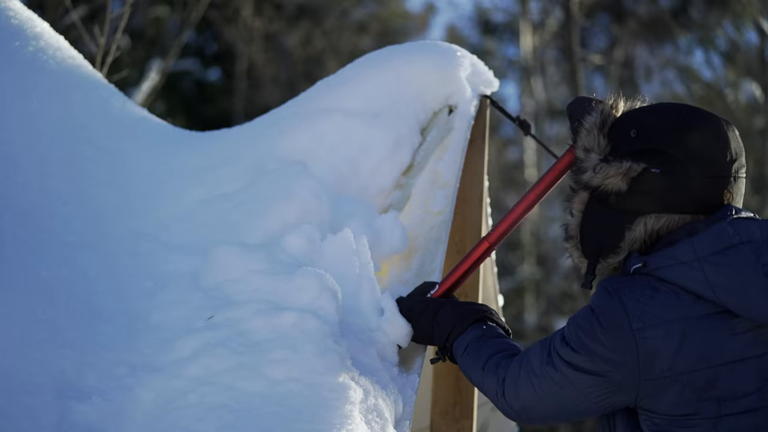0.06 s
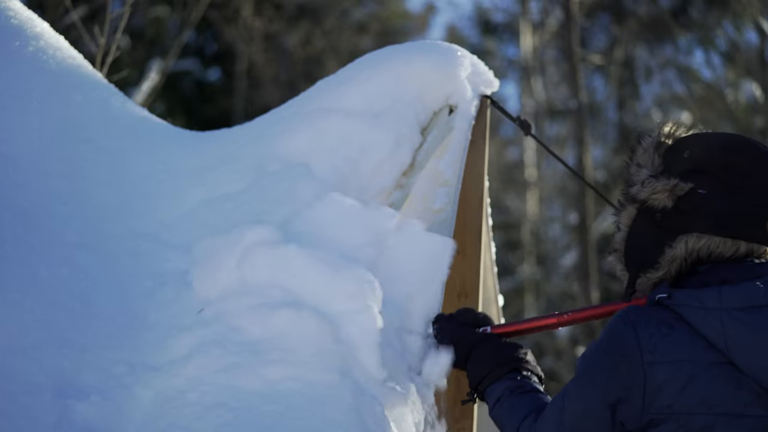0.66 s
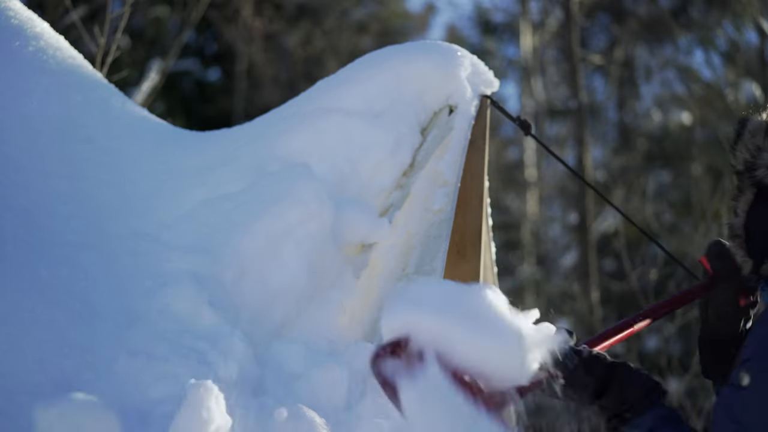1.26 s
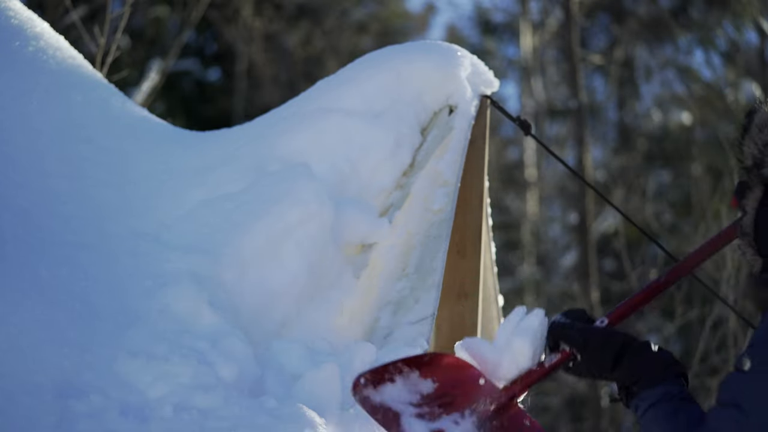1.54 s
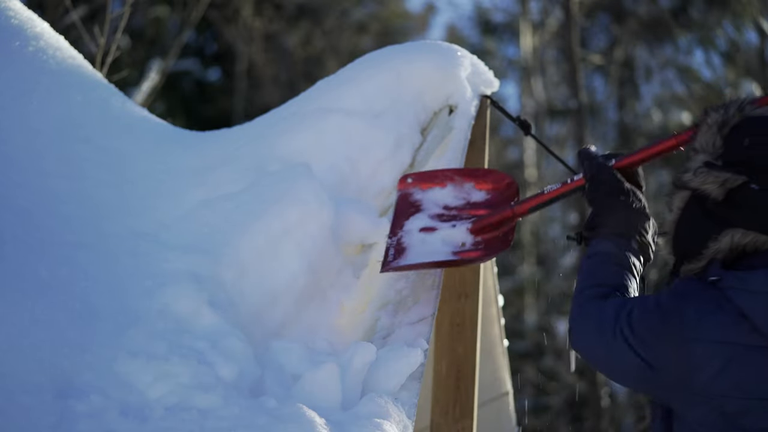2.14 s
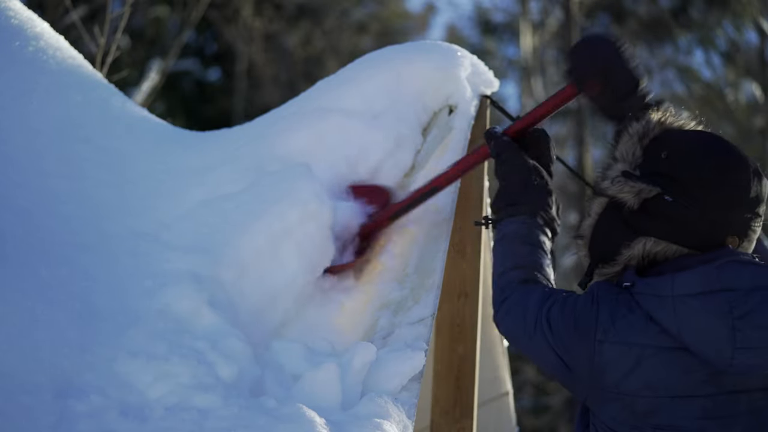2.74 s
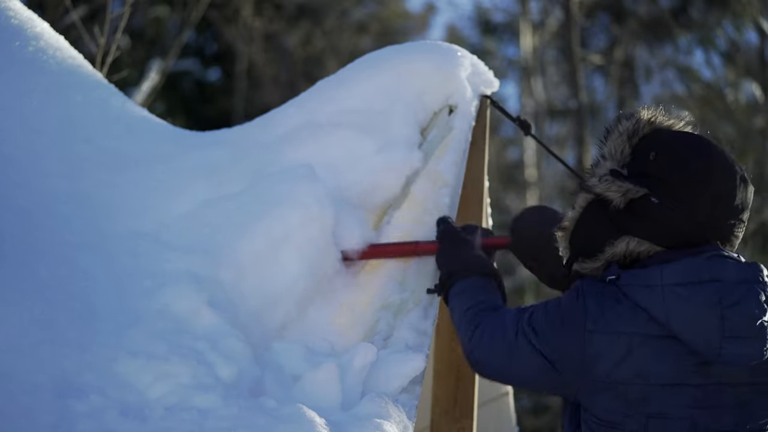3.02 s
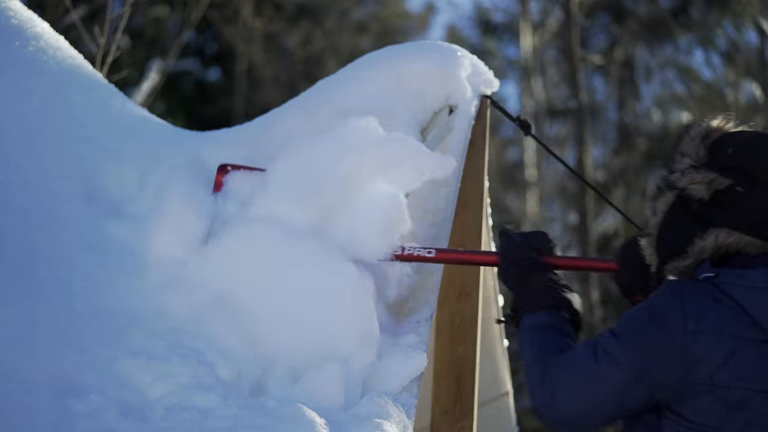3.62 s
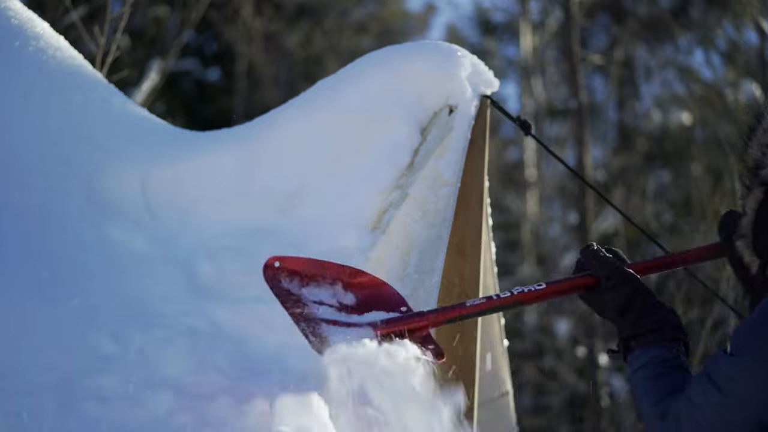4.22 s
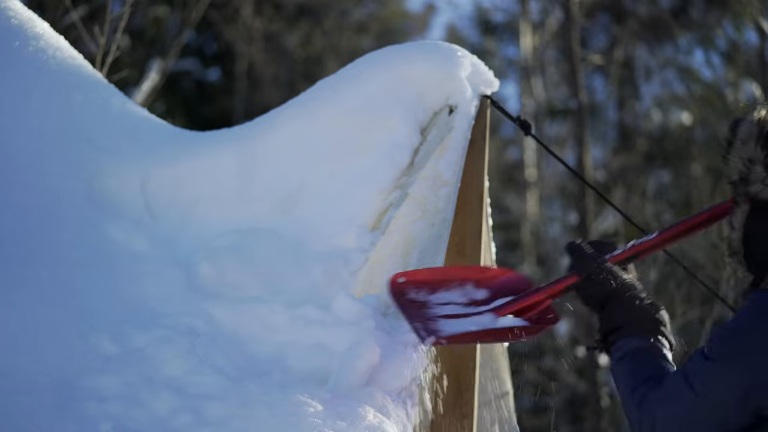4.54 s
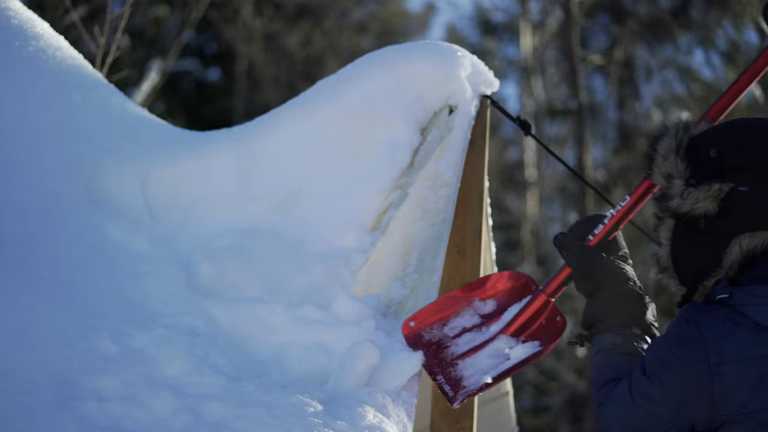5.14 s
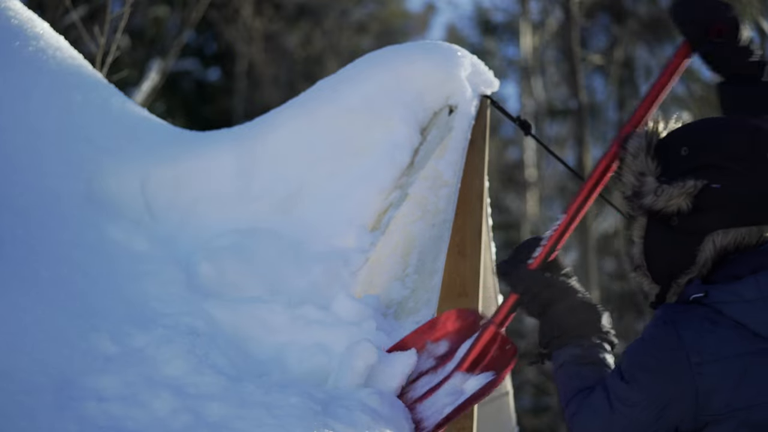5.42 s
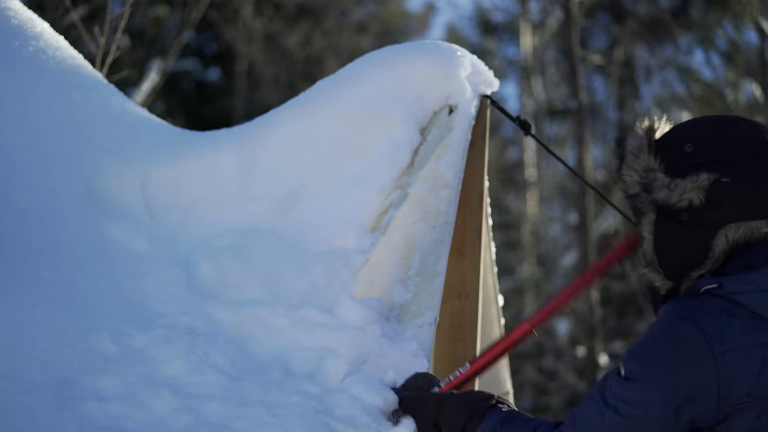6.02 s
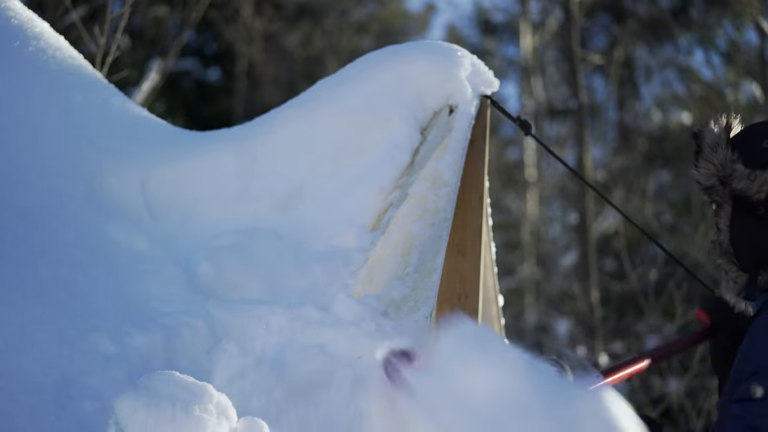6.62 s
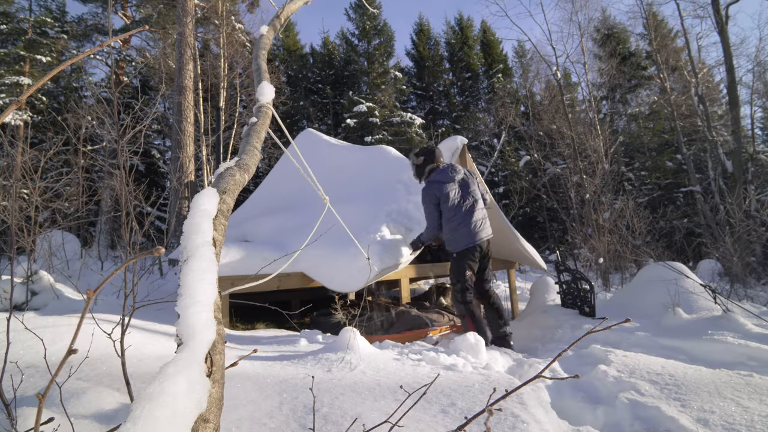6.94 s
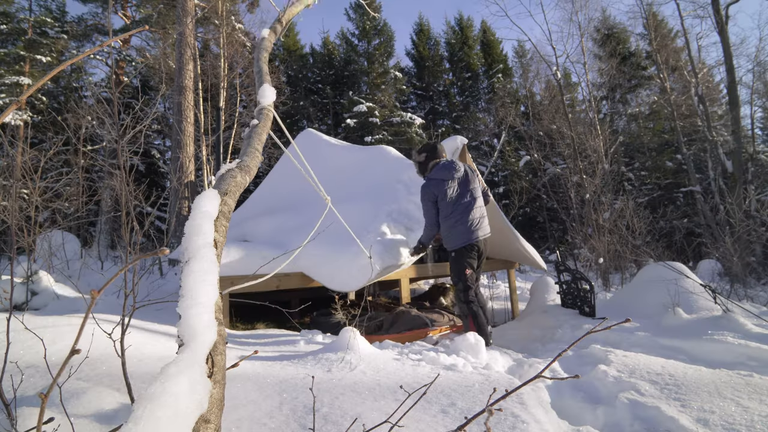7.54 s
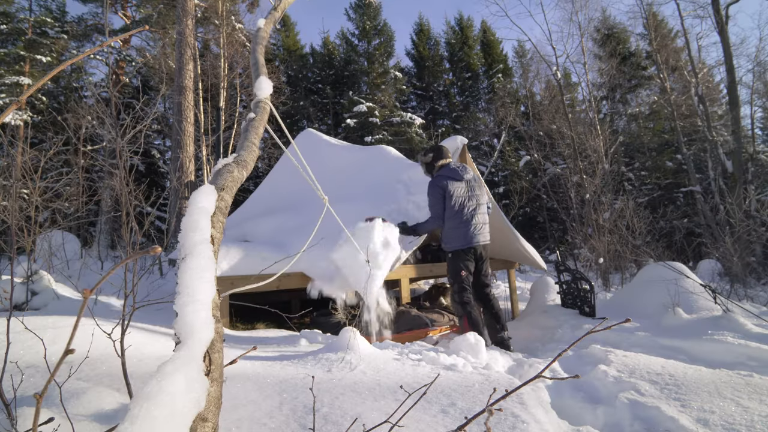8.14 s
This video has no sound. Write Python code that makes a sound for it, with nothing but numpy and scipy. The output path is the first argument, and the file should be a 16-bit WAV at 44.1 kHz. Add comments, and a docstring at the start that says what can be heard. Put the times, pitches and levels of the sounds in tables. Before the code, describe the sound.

A shovel scrapes heavy snow off a canvas tent roof in four crunching loads, with soft thuds and a final sharp knock.

```python
"""Shovelling snow off a tent

A shovel drags heavy snow off a canvas roof in four loads, close by in a still winter wood. Crust breaks
in dense grains, clods give way, packed snow crumps on the canvas and powder hisses as it slides off.
The scoop colours the scraping, the metal shaft clicks and rings, lumps thud down, and a sharp knock
of the blade ends it."""
import sys
import numpy as np
from scipy import signal
from scipy.fft import rfft, irfft, next_fast_len
from scipy.io import wavfile
from scipy.ndimage import uniform_filter1d

SR = 44100
rng = np.random.default_rng(int(sys.argv[2]) if len(sys.argv) > 2 else 0)


def persist_wave(psi):
    """Save psi, clipped to +-1, as 16-bit WAV."""
    counts = np.round(np.clip(psi, -1, 1) * 32767).astype(np.int16)
    wavfile.write(sys.argv[1], SR, np.atleast_2d(counts).T)


N = 369558
TIME = np.arange(N) / SR

# slabs breaking away: t/s, rise/s, hold/s, release/s, swish/dB, crunch of their edges/dB
SLAB_FALLS = [(.25, 0.17, 0.17, .4, -73, -63.5), (2.1, 0.058, 0.017, 0.61, -61.5, -59.5),
              (3.63, 0.028, 0.035, 0.07, -62, -61), (3.82, 0.042, 0.094, 0.14, -74, -60),
              (4.14, 0.034, 0.014, 0.054, -68, -77), (5.5, 0.21, 0.033, .5, -79, -65),
              (6.65, 0.1, 0.059, 0.68, -63, -63), (7.33, 0.086, 0.35, 0.88, -57.5, -68),
              (8.31, 0.019, 0.044, 0.24, -58.5, -61.5)]
# modes of the metal shaft: f/Hz, level/dB, t60/s
SHAFT_MODES = [(3424, -6, 0.03), (5450, 3, 0.034), (5580, -3, 0.012)]
# modes of the free scoop: f/Hz, level/dB, t60/s
SCOOP_MODES = [(546, -14.5, 0.13), (818, -14.5, 0.14), (706, -16, 0.09), (987, -18, 0.082),
               (1120, -16, .06), (1606, -12, 0.1), (1710, -5, 0.055), (1797, -1.5, 0.077), (1958, 1, 0.035),
               (2310, -13, .05), (2440, -7.5, 0.079), (2768, 0, .06), (2870, -5.5, 0.099),
               (2954, -13, 0.054), (3130, -19, 0.11), (3480, -10, 0.09), (3694, -9, 0.055),
               (4200, -12, .06), (4460, -8, 0.055), (4700, -12, 0.087), (5160, -3, 0.051), (5200, 1, 0.036),
               (5340, -3, .035), (6380, -11, .05), (6560, -2, .035), (7327, -7, .035), (7820, -14, .04)]


def undb(db):
    """Decibels to gain."""
    return 10 ** (np.asarray(db) / 20)


def unit(x):
    """Scale to rms 1."""
    return x / np.sqrt(np.mean(x ** 2))


def colour(x, curve, tilt_db=0):
    """EQ by a curve of (f/Hz, level/dB); the tilt per octave pivots at 3 kHz, flat below 375 Hz."""
    size = next_fast_len(len(x) + 512)
    octave = np.log2(np.maximum(np.fft.rfftfreq(size, 1 / SR), 1))
    hz, db = np.transpose(curve)
    from_pivot = np.maximum(octave - np.log2(3000), -3)
    gain = undb(np.interp(octave, np.log2(hz), db) + tilt_db * from_pivot)
    return irfft(rfft(x, size) * gain, size)[:len(x)]


def ring(x, modes):
    """Drive a set of decaying modes."""
    t = TIME[:SR // 6]
    response = 0
    for hz, db, t60 in modes:
        phase = 2 * np.pi * hz * t + rng.uniform(0, 2 * np.pi)
        response += undb(db) * np.exp(-np.log(1000) * t / t60) * np.sin(phase)
    return signal.fftconvolve(x, response / np.sqrt(np.sum(response ** 2)))[:len(x)]


def resonate(x, peaks):
    """Drive a set of broad resonances, each applied twice for dark valleys."""
    out = 0
    for hz, width, db in peaks:
        b, a = signal.iirpeak(hz, hz / (1.5 * width), fs=SR)
        out += undb(db) * signal.lfilter(b, a, signal.lfilter(b, a, x))
    return out


def walk(rate):
    """Random modulation at rms 1, gliding to a new value rate times a second."""
    step = max(int(SR / rate), 2)
    held = np.repeat(rng.standard_normal(N // step + 1), step)
    return unit(uniform_filter1d(held, step)[:N])


def grains(rate, spread_db):
    """Tiny fractures of uneven size at random moments, about rate a second; rms 1."""
    chance = np.clip(rate / SR, 1e-4, 1)
    size = undb(spread_db * np.minimum(rng.exponential(size=N), 5))
    return unit((rng.random(N) < chance) * size * rng.choice([-1, 1], N) / np.sqrt(chance))


def burst(decay_s, rise_s):
    """Noise that builds up and dies away, like a run of micro-fractures."""
    t = TIME[:SR // 6]
    envelope = np.minimum(t / rise_s, 1) * np.exp(-np.maximum(t - rise_s, 0) / decay_s)
    return rng.standard_normal(len(t)) * envelope


def gestures(table):
    """Power envelopes that swell, hold and fall 20 dB per release time, then the remaining columns."""
    power = np.zeros((len(table), N))
    for row, (start, rise_s, hold_s, release_s, *_) in enumerate(table):
        span = slice(*np.searchsorted(TIME, [start, start + rise_s + hold_s + 3 * release_s]))
        t = TIME[span] - start
        fall = np.exp(-2 * np.log(10) * np.maximum(t - rise_s - hold_s, 0) / release_s)
        power[row, span] = np.minimum(t / rise_s, 1) ** 2 * fall
    return power, *np.transpose(table)[4:]


def together(power, db):
    """Joint amplitude of overlapping gestures, each at its own level."""
    return np.sqrt(undb(db) ** 2 @ power + 1e-18)


def add(out, start, x, peak_db):
    """Mix in a one-shot at start seconds."""
    i = int(start * SR)
    out[i:i + len(x)] += (x * undb(peak_db) / np.max(np.abs(x)))[:N - i]


def sliding_snow(slip_db=0.76, catch_db=1.52, lurch_db=0.15, grain_rate=4200, ice_rate=1100):
    """Snow sticks and slips under the blade; faster sliding breaks more grains and sounds smoother."""
    # blade strokes through the crust: t/s, rise/s, hold/s, release/s, crunch/dB, grit/dB, powder/dB,
    # scoop/dB (these three against the crunch), hardness/(dB per octave), clear ring against rasp/dB
    strokes = [(0, 0.00047, 0.01, 0.17, -59, -1, -0.5, -14, -2, -5),
               (.25, .034, 0.47, .2, -78, 7, -14, -18, -1, -6),
               (.87, 0.016, 0.18, 0.043, -58, 0.5, 4, -3, 8, -3),
               (1.08, 0.031, 0.1, 0.12, -61, 3.5, 5, 9, 7, -3),
               (1.28, 0.029, 0.035, 0.03, -47, -7.5, -3.5, 7, 12, 9),
               (1.352, 0.012, 0.017, 0.034, -41.5, -8, -6, 9, 5, 17),
               (1.435, 0.0094, 0.041, 0.12, -54.5, -5, -3.5, 12, -8, 3),
               (1.63, .11, 0.1, 0.041, -59, -1.5, -4, -6, 8, 3),
               (2.46, 0.031, 0.0094, 0.25, -55.5, -3.5, -3, -9, -2, -5),
               (2.65, 0.078, 0.11, 0.26, -53, 4.5, 3.5, -4, 0, 3),
               (2.797, 0.021, 0.013, 0.045, -47, 2, -8, 3, 9, 2),
               (4.08, .1, 0.022, 0.061, -58.5, -3.5, -2, -4, -8, 1),
               (4.35, 0.038, 0.035, 0.03, -60.5, -0.5, 2, -3.5, 2, 0),
               (4.41, .025, 0.097, 0.074, -73.5, 4, 13, -7, 0, -6),
               (4.483, .006, 0.021, 0.11, -62.5, -3, -8, -14, -4, -6),
               (4.57, .025, 0.035, .04, -75.5, 6, 4, 6, 4, -2),
               (5.08, 0.069, 0.0064, 0.097, -70.5, -3, -13, -10, -6, -6),
               (5.26, 0.0036, 0.019, .02, -61.5, -6, -16, 6, -3, -5),
               (5.297, .008, 0.2, .05, -68, 3, -4, -5, -2, -3), (5.35, .02, .13, .05, -69, 6, -5, -3, 1, 0),
               (5.49, 0.063, 0.12, 0.25, -44.5, 0, -7.5, 4, -9, -3),
               (5.58, 0.11, 0.13, 0.58, -44, -2.5, -1, 3, 8, -3),
               (5.7, 0.19, 0.062, 0.19, -56, -3, 11, -3, 2, 3),
               (6.63, 0.068, 0.17, 0.12, -52, -0.5, -4, 2, 7, -2),
               (6.975, 0.021, 0.037, 0.055, -53.5, 0.5, -4, -20, 1, -1),
               (7.4, .03, .033, 0.2, -54.5, -8, -18, -22, 4, -6),
               (7.78, 0.12, 0.069, 0.17, -51, -1.5, -3, -7, -12, -6),
               (8.1, .02, 0.011, 0.069, -60.5, 5, 2, 5, 5, 2),
               (8.16, 0.044, 0.033, .05, -51.5, 1.5, -5, -1, -7, 3)]
    # the loose load creeping off: t/s, rise/s, hold/s, release/s, crump/dB, crumbs/dB, powder/dB
    slides = [(0, 0.0009, 0.023, 0.61, -65.5, -65, -78), (.22, 0.073, 0.65, 0.8, -62.5, -58, -62),
              (1.29, 0.041, 0.059, 0.049, -62, -62, -59), (1.48, 0.2, 0.044, 0.23, -85, -69, -58.5),
              (1.7, 0.059, 0.49, 0.48, -74.5, -70.5, -71), (2.1, 0.16, 1.57, 0.87, -67.5, -64.5, -64.5),
              (2.68, 0.12, 0.035, 0.3, -56.5, -74, -70), (4.35, 0.032, 0.032, 0.049, -66.5, -68, -75),
              (4.2, 0.062, 0.52, 0.2, -76, -74, -80), (5.5, 0.26, 0.44, 0.5, -60.5, -55.5, -73),
              (6.54, 0.084, 0.052, .1, -67, -64, -65.5), (6.68, 0.15, 0.25, 0.22, -63, -63, -71),
              (7.05, 0.23, 0.11, 0.18, -71.5, -61.5, -66), (7.35, 0.1, 0.63, 0.8, -60.5, -57.5, -81),
              (7.8, 0.19, 0.025, 0.092, -54.5, -68, -74)]
    # EQ of breaking crust, icy grit, fine powder and packed snow: f/Hz, level/dB
    crunch_eq = [(250, -31), (600, -7), (850, -4), (1300, 0.5), (2000, 0.5), (3000, -2), (4200, -7.5),
                 (6000, -18), (9000, -38), (16000, -45)]
    grit_eq = [(1800, -22), (3200, 0.5), (4300, 1.5), (5300, 3), (6500, 0), (8000, -3.5), (10000, -9.5),
               (16000, -17)]
    powder_eq = [(4000, -41), (7000, -1), (9000, 0), (11000, 0), (14000, 0.5), (16000, 2)]
    crump_eq = [(40, -46), (70, -22), (105, -3.5), (170, -2), (260, 0), (340, 1), (430, 2), (530, -2.5),
                (700, -7.5), (1400, -22)]
    crumb_grit_db, press_db, press_limit_db = -3.5, -16.5, -67

    stroke, stroke_db, grit_db, powder_db, scoop_db, hardness_db, clear_db = gestures(strokes)
    slide, crump_db, crumbs_db, dust_db = gestures(slides)
    slab, _, edge_db = gestures(SLAB_FALLS)
    blade, crumbs = together(stroke, stroke_db), together(slide, crumbs_db)
    loose = np.hypot(crumbs, together(slab, edge_db))
    flow = (np.hypot(blade, loose) / undb(-57.5)) ** .6
    roughness = np.clip(flow ** -.25, .4, 1.1)
    judder_db = (slip_db * walk(420) + catch_db * walk(70)) * roughness
    slips = unit(undb(judder_db + lurch_db * walk(35)))

    crust = unit(colour(grains(grain_rate * flow, spread_db=2.0), crunch_eq))
    scrape = grains(grain_rate * flow, spread_db=2.5) * slips
    hardness = (hardness_db * undb(stroke_db) ** 2) @ stroke / blade ** 2
    rasp, clear = scoop_rasp(scrape, hardness), scoop_ring(scrape)
    # crust, hollow rasp and clear ring share each stroke's power
    crust_db = stroke_db - 10 * np.log10(1 + undb(scoop_db) ** 2)
    rasp_db = crust_db + scoop_db - 10 * np.log10(1 + undb(clear_db) ** 2)
    ice = grains(6000 * flow, spread_db=2.5) * slips * undb(0.73 * walk(150))
    grit = blade_shimmer(colour(ice, grit_eq))
    # powder is a smooth hiss with larger ice crystals ticking in it
    crystals = grains(ice_rate * flow, spread_db=1.5) * np.clip(1.1 / flow ** .5, .1, 1)
    powder = blade_shimmer(colour((rng.standard_normal(N) + crystals) * slips, powder_eq))
    # packed snow collapses in coarser steps, muffled by the canvas
    crump = unit(colour(grains(1600, spread_db=1.3) * slips, crump_eq))
    pressed = np.minimum(blade * undb(press_db), undb(press_limit_db))
    return (crust * slips * np.hypot(together(stroke, crust_db), loose)
            + rasp * together(stroke, rasp_db)
            + clear * together(stroke, rasp_db + clear_db)
            + grit * np.hypot(together(stroke, stroke_db + grit_db), crumbs * undb(crumb_grit_db))
            + powder * np.hypot(together(stroke, stroke_db + powder_db), together(slide, dust_db))
            + crump * np.hypot(together(slide, crump_db), pressed))


def scoop_rasp(scrape, tilt_db, wander_db=2):
    """The buried scoop rasps; resonances swell as the contact travels, and hard contact is brighter."""
    # resonances damped by snow: f/Hz, width/Hz, level/dB
    buried_peaks = [(957, 41, -11), (1650, 180, 1), (1800, 220, 1), (2314, 250, 1), (2706, 380, 1.5),
                    (3140, 570, -4.5), (4200, 650, -14), (5100, 470, -18), (6130, 500, -29)]
    out, power = 0, 0
    for hz, width, db in buried_peaks:
        gain = undb(db + tilt_db * np.log2(hz / 2500))
        out += resonate(scrape, [(hz, width, 0)]) * gain * undb(wander_db * walk(22))
        power += gain ** 2 * width
    return unit(out / np.sqrt(power))


def scoop_ring(scrape, wander_db=3, wander_rate=7):
    """The bare part of the scoop rings clearly; which modes answer changes as the contact travels."""
    # modes with the edge pressed down: f/Hz, level/dB, t60/s
    pressed_modes = [(1285, -14, .035), (1750, -5.5, 0.056), (2237, 0.5, .02), (2573, 1, 0.037),
                     (2770, -1.5, 0.022), (3280, -13, .03), (3490, -5.5, 0.046), (3690, -5, 0.032),
                     (3880, -2.5, 0.034), (4650, -2, 0.038), (4950, -8.5, 0.034), (5400, -3.5, 0.038),
                     (6350, -9, .025), (7540, -10, 0.033), (8900, -7.5, 0.024), (11000, -13, 0.018)]
    out = 0
    for hz, db, t60 in pressed_modes:
        width = np.log(1000) / (np.pi * t60)
        mode = signal.lfilter(*signal.iirpeak(hz, hz / width, fs=SR), scrape)
        out += mode * undb(db + wander_db * walk(wander_rate)) / width
    return unit(out)


def blade_shimmer(x, tail_db=-8, decay_s=0.0058):
    """The blade's crowded high modes give each grain a short tail that shifts as the contact moves."""
    out = x
    for _ in range(3):
        tail = burst(decay_s, rise_s=0.00047)[:SR // 30]
        ringing = signal.oaconvolve(x, tail / np.sqrt(3 * np.sum(tail ** 2)))[:N]
        out = out + undb(tail_db) * ringing * np.clip(walk(2.49), -1, 1)
    return unit(out)


def shaft_rub(waver_db=3, drift_hz=32):
    """Ice grains scratch the metal tube and keep it ringing in short squeaks."""
    # rubs on the roof edge: t/s, rise/s, hold/s, release/s, ring/dB, whistle/dB
    rubs = [(0, 0.0056, 0.027, 0.14, -62.5, -80), (.26, 0.066, 0.4, 0.45, -61, -77),
            (.47, 0.025, 0.015, 0.16, -56, -71), (1.2565, .001, .002, 0.04, -57, -45),
            (1.28, .03, 0.08, .2, -64, -75), (2.7, .13, .06, .1, -58, -72),
            (4.35, 0.036, 0.03, .08, -67, -62), (5.6, 0.23, .22, .65, -57, -63),
            (6.64, 0.004, .003, 0.027, -62, -49), (6.66, 0.036, 0.18, 0.051, -73, -63),
            (6.99, 0.015, 0.024, .06, -55, -62), (7.4, .03, .015, .06, -51.5, -68),
            (7.62, .08, .05, .25, -77, -80)]
    # the thin top whistle: f/Hz, width/Hz, level/dB
    whistle_peaks = [(15150, 140, 0), (15500, 260, -7)]
    rub, ring_db, whistle_db = gestures(rubs)
    scratches = grains(1800, spread_db=2.2) * undb(waver_db * walk(40))
    # the moving contact keeps detuning the ring
    drift = np.exp(2j * np.pi * drift_hz * np.cumsum(walk(120)) / SR)
    analytic = signal.hilbert(ring(scratches, SHAFT_MODES), next_fast_len(N))[:N]
    singing = unit(np.real(analytic * drift))
    whistle = unit(resonate(scratches, whistle_peaks))
    return singing * together(rub, ring_db) + whistle * together(rub, whistle_db)


def winter_air(level_db=-77):
    """A faint bed of outdoor noise whose level drifts slowly."""
    # EQ of the still wood: f/Hz, level/dB
    air_eq = [(20, -23), (38, -23), (48, -3), (60, -14), (100, -7.5), (280, -16), (420, -3), (620, -17.5),
              (2000, -14), (8000, -20.5), (16000, -23.5)]
    return unit(colour(rng.standard_normal(N), air_eq)) * undb(level_db + walk(1.54))


def slab_swish():
    """Slabs of soft snow swish down the canvas in small jerks."""
    # EQ of soft snow on cloth: f/Hz, level/dB
    swish_eq = [(200, -15), (450, -3.5), (650, 0), (900, -1.5), (1300, -5.5), (2000, -9), (4000, -19)]
    slab, swish_db, _ = gestures(SLAB_FALLS)
    friction = grains(3000, spread_db=2.5) * undb(2 * walk(60))
    return unit(colour(friction, swish_eq)) * together(slab, swish_db)


def shaft_clicks(boost_db=4.0, decay_s=0.0024):
    """Sharp ticks of the shovel set its shaft ringing."""
    # clicks: t/s, peak before the boost/dB, ring against tick/dB, f/Hz
    clicks = [(.2715, -46, -12, 5800), (.357, -44.5, -15, 5600), (0.479, -50, -10, 6500),
              (0.497, -44, -7, 5500), (0.581, -44.5, -1, 5500), (.788, -44.5, -15, 5600),
              (0.8406, -34.5, -15, 5700), (.9921, -40, -13, 5800), (1.257, -47, -12, 5800),
              (1.449, -42, -15, 7500), (1.547, -44, -26, 9700), (1.59, -51, -20, 10500),
              (2.009, -57, -24, 10000), (2.7112, -33.5, -20, 5000), (3.786, -34.5, -24, 5970),
              (4.314, -50.5, -15, 5500), (4.7105, -47.5, -22, 9000), (6.366, -35, -25, 5800),
              (6.6436, -42.5, -23, 5730), (7.6945, -44.5, -6, 5500)]
    out = np.zeros(N)
    for start, db, ring_db, hz in clicks:
        tick_eq = [(500, -17), (2000, -6), (hz * 0.81, -2.5), (hz, 7.5), (hz * 1.33, 1.5), (16000, -3.5)]
        tick = colour(burst(decay_s, rise_s=0.00031), tick_eq)
        add(out, start, tick + undb(ring_db) * ring(tick, SHAFT_MODES), db + boost_db)
    return out


def crust_snaps(boost_db=4, ring_db=-19.0):
    """The crust snaps and the scoop rings faintly with it."""
    # snaps: t/s, peak before the boost/dB, tilt/(dB per octave), decay/s
    snaps = [(.335, -55, -7, .003), (1.377, -35, 3.5, 0.0036), (1.7963, -34.5, 1.5, 0.0012),
             (3.051, -55, -5, 0.0046), (3.103, -43, 0, 0.0019), (3.122, -44.5, -1, 0.0056),
             (3.321, -52, 1, 0.007), (3.381, -54, 1, .005), (3.785, -46, 0, .002), (3.435, -53, -3, 0.0027),
             (3.8507, -46.5, -2.5, 0.0014), (4.169, -49, -1, .002), (4.209, -44, 3, 0.0022),
             (4.354, -51.5, 2, .0026), (5.302, -56, 5, .0026), (5.488, -44, 4, .006),
             (6.3655, -42, 1, .0012), (6.4995, -42, 0, 0.002), (6.833, -37, 4, 0.0033),
             (6.909, -48, -14, 0.002), (7.2, -51, 4.5, .0026), (7.383, -45, 6, 0.0028),
             (7.426, -40, 4, 0.0018), (7.434, -33.5, -1, 0.0018), (7.453, -43, 3, 0.0022),
             (7.466, -48.5, -14, .0026), (7.592, -47.5, -14, 0.0046), (7.642, -45.5, -4, .003),
             (7.694, -45.5, -9, 0.0027), (7.707, -40.5, 1, 0.0029), (7.745, -49, -3, 0.0023),
             (7.769, -40, 3, 0.01)]
    snap_eq = [(60, -38), (200, -8.0), (600, 6.0), (1600, 10.5), (2800, 8.5), (6000, -2.0),
               (16000, -13.5)]
    out = np.zeros(N)
    for start, db, tilt_db, decay_s in snaps:
        snap = colour(burst(decay_s, rise_s=0.00054), snap_eq, tilt_db)
        add(out, start, snap + undb(ring_db) * ring(snap, SCOOP_MODES), db + boost_db)
    return out


def clod_crunches(rise_s=0.001, decay_s=0.0032, ring_db=-1, width_hz=380):
    """A clod collapses in a run of coarse fractures, and the part of the scoop it touches answers."""
    # clods giving way: t/s, peak/dB, length/s, scoop f/Hz
    clods = [(0.896, -40, 0.013, 2200), (.963, -40.5, 0.0093, 1800), (0.99, -39.5, .005, 2490),
             (1.004, -42, .004, 4700), (1.05, -41, 0.016, 3600), (1.134, -44, .004, 2500),
             (1.16, -45, .01, 3500), (1.197, -45, 0.021, 3380), (2.187, -47, 0.026, 1350),
             (2.74, -36, .006, 4200), (2.815, -38, .018, 2960), (2.896, -42, .008, 5300),
             (3.412, -51, .012, 750), (3.506, -54, .007, 1300), (3.636, -47, .012, 1400),
             (3.674, -47, .01, 1500), (3.914, -53, .006, 1300), (3.933, -47.5, .02, 2200),
             (3.99, -50, .005, 1000), (4.375, -46, 0.014, 4300), (4.416, -49, 0.011, 3600),
             (4.484, -45, .007, 1490), (5.5015, -31.5, 0.0036, 1690), (5.513, -34, 0.0041, 1730),
             (5.527, -34, 0.0094, 2320), (5.549, -28.5, .007, 1680), (5.604, -30.5, 0.0089, 2390),
             (5.648, -32, .009, 2500), (5.671, -26, 0.027, 2560), (5.762, -28, 0.013, 2750),
             (5.793, -29.5, .008, 1974)]
    # EQ of the crush: f/Hz, level/dB
    crush_eq = [(200, -25), (700, -2), (1500, -1), (3000, 3), (5500, -5.5), (8000, -9), (16000, -19)]
    t, out = TIME[:SR // 12], np.zeros(N)
    fractures = grains(4000, spread_db=2.0)[:len(clods) * len(t)].reshape(len(clods), -1)
    for (start, db, length_s, hz), run in zip(clods, fractures):
        envelope = np.minimum(t / rise_s, 1) * np.exp(-np.maximum(t - length_s, 0) / decay_s)
        crush = colour(run * envelope, crush_eq)
        answer = resonate(crush, [(hz, width_hz, 0)])
        add(out, start, unit(crush) + undb(ring_db) * unit(answer), db)
    return out


def blade_squeaks():
    """Quick stick-slip steps feed a single resonance of blade or canvas."""
    # groans and squeaks: t/s, rise/s, hold/s, release/s, level/dB, f/Hz, width/Hz
    squeaks = [(1.44, 0.023, 0.045, 0.053, -62.5, 1134, 70), (2.69, 0.04, 0.12, 0.11, -54.5, 2760, 260),
               (2.795, 0.02, 0.021, 0.045, -50, 1716, 80), (2.78, 0.021, 0.081, 0.044, -54, 5420, 170),
               (3.2, 0.048, .012, 0.032, -62, 450, 50), (5.26, 0.0038, 0.022, 0.042, -70, 950, 100),
               (5.485, 0.015, 0.24, .2, -53.5, 1720, 340), (5.55, .12, .02, .14, -50.5, 2520, 260),
               (5.54, .04, .1, .15, -54, 6300, 250), (5.74, .08, .14, .2, -59, 11050, 420),
               (5.84, 0.045, .05, 0.065, -49, 5040, 601), (6.74, 0.025, 0.089, 0.12, -58.5, 1800, 108),
               (6.74, .05, 0.075, .06, -63, 1164, 60)]
    steps = grains(2500, spread_db=1.0)
    return sum(unit(resonate(steps, [(hz, width, 0)])) * np.sqrt(power) * undb(db)
               for power, db, hz, width in zip(*gestures(squeaks)))


def lump_thuds():
    """Lumps of snow land on canvas and ground with a dull thud."""
    # landings: t/s, peak/dB, f/Hz, decay/s
    thuds = [(1.575, -63, 185, 0.02), (2.409, -57, 128, 0.014), (2.43, -79, 71, 0.028),
             (3.051, -56, 413, 0.0038), (3.103, -44.5, 218, 0.0015), (3.322, -59, 230, 0.0068),
             (3.418, -51, 300, 0.008), (3.509, -51.5, 282, 0.011), (3.635, -52, 292, 0.03),
             (4.005, -62, 200, 0.0076), (5.151, -69, 300, 0.023), (5.681, -48, 270, 0.01),
             (5.87, -56, 200, 0.028), (6.07, -49, 199, 0.027), (6.91, -46.5, 310, 0.0045),
             (6.92, -47.5, 298, .004), (7.06, -64, 110, 0.022), (7.435, -55, 353, 0.011),
             (7.707, -52, 280, 0.011), (7.962, -50, 170, 0.021), (8.326, -50, 145, 0.01)]
    out = np.zeros(N)
    for start, db, hz, decay_s in thuds:
        band = signal.butter(2, [hz * 0.62, hz * 1.46], "band", fs=SR, output="sos")
        add(out, start, signal.sosfilt(band, burst(decay_s, rise_s=0.0026)), db)
    return out


def blade_skid():
    """The emptied blade chatters over frozen canvas with a hollow rasp and a high sizzle."""
    # skids: t/s, rise/s, hold/s, release/s, rasp/dB, sizzle/dB
    skids = [(1.69, 0.057, 0.056, .05, -59, -68), (1.775, 0.014, 0.008, 0.044, -49, -56),
             (1.823, 0.0093, .014, 0.019, -67, -53)]
    # resonances of rasp and sizzle: f/Hz, width/Hz, level/dB
    rasp_peaks = [(1016, 47, 1.5), (1180, 38, 3), (1810, 130, -7), (2250, 340, -7), (3290, 150, -15),
                  (4640, 250, -10)]
    sizzle_peaks = [(11600, 900, 2), (12600, 1400, -3)]
    touch, rasp_db, sizzle_db = gestures(skids)
    chatter = grains(1700, spread_db=-1.0)
    return (unit(resonate(chatter, rasp_peaks)) * together(touch, rasp_db)
            + unit(resonate(chatter, sizzle_peaks)) * together(touch, sizzle_db))


def blade_knocks():
    """The free scoop strikes the tent; snow on it crushes first, so the ring takes a moment to build."""
    # knocks: t/s, peak/dB, rise/s, crack decay/s, crack against ring/dB, ring tilt/(dB per octave),
    # share of the ring time that the snow leaves
    knocks = [(5.149, -45.5, 0.0021, .003, -5, -2, 0.62), (5.2596, -43.5, 0.00058, 0.0028, -6, 0, 0.48),
              (5.2625, -45.5, 0.00054, .003, -2, -4, 0.6), (8.303, -40, .002, 0.0031, -2, 2, .5),
              (8.306, -17.5, 0.0063, 0.008, -5, 1, 1), (8.37, -43, .002, 0.0044, 1, -1, .5)]
    crack_eq = [(80, -30), (300, -21), (700, -1.0), (1300, -7), (3000, -6.5), (7000, -0.5),
                (11000, -7.5), (16000, -11)]
    out = np.zeros(N)
    for start, db, rise_s, decay_s, crack_db, tilt_db, ring_share in knocks:
        crack = colour(burst(decay_s, rise_s), crack_eq)
        modes = [(hz, mode_db + tilt_db * np.log2(hz / 2500), t60 * ring_share)
                 for hz, mode_db, t60 in SCOOP_MODES]
        attack = np.minimum(TIME[:len(crack)] / rise_s, 1)
        body = ring(signal.unit_impulse(len(crack)), modes) * attack
        add(out, start, unit(body) + undb(crack_db) * unit(crack), db)
    return out


def scoop_glide(chatter_db=2):
    """Barely loaded, the scoop keeps steady resonances while the crust scratches its back."""
    # the glide before the bite: t/s, rise/s, hold/s, release/s, level/dB
    glides = [(5.295, .008, 0.2, .08, -61)]
    # resonances of the gliding scoop: f/Hz, width/Hz, level/dB
    glide_peaks = [(991, 41, -8), (1580, 110, -4), (1820, 120, 0), (2140, 90, 0), (2700, 120, 0),
                   (3400, 130, -5), (4440, 120, -12)]
    touch, db = gestures(glides)
    scratches = grains(3000, spread_db=-1.0) * undb(chatter_db * walk(120))
    return unit(resonate(scratches, glide_peaks)) * together(touch, db)


def scene():
    """Open air over soft snow gives no echo; both channels carry the same mono mix."""
    scraping = sliding_snow() + clod_crunches() + slab_swish()
    rubbing = scoop_glide() + shaft_rub() + blade_skid() + blade_squeaks()
    hits = shaft_clicks() + crust_snaps() + lump_thuds() + blade_knocks()
    mono = scraping + rubbing + hits + winter_air()
    return np.array([mono, mono])


def record(dry):
    """A low cut clears the deepest rumble and a steep high cut trims the very top."""
    low_cut = signal.butter(3, 38, "high", fs=SR, output="sos")
    high_cut = signal.ellip(10, .2, 70, 15850, fs=SR, output="sos")
    return signal.sosfilt(high_cut, signal.sosfilt(low_cut, dry))


dry = scene()
out = record(dry)
persist_wave(out)
```